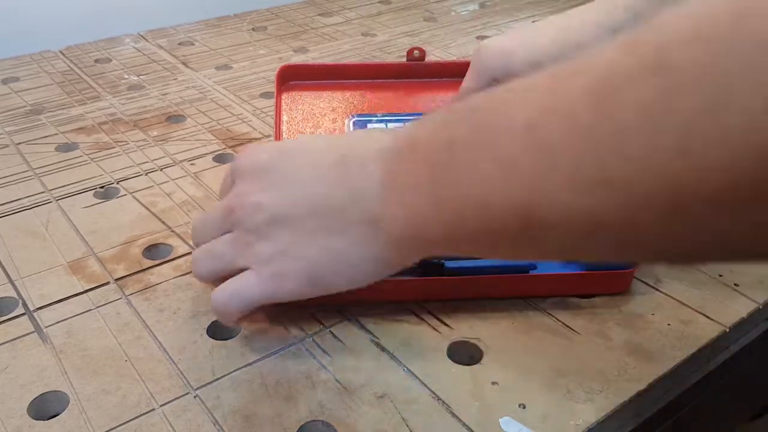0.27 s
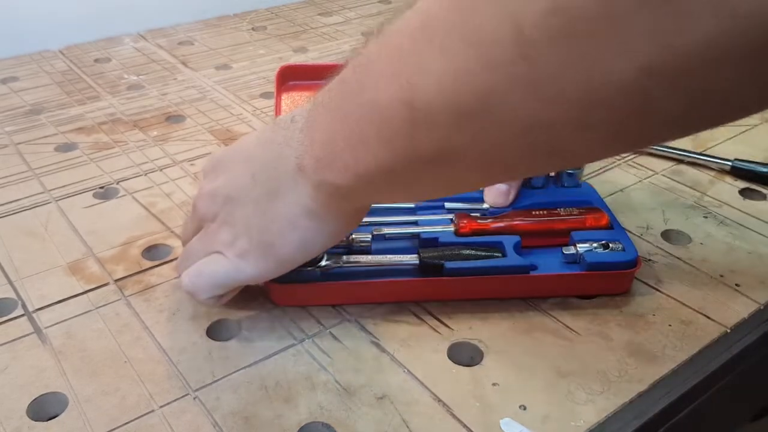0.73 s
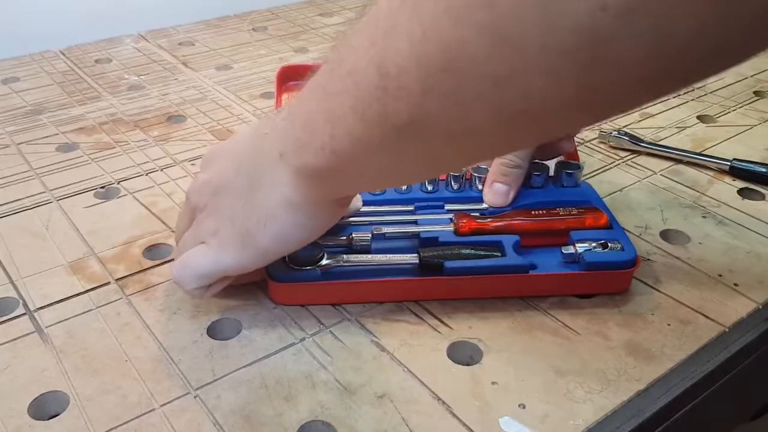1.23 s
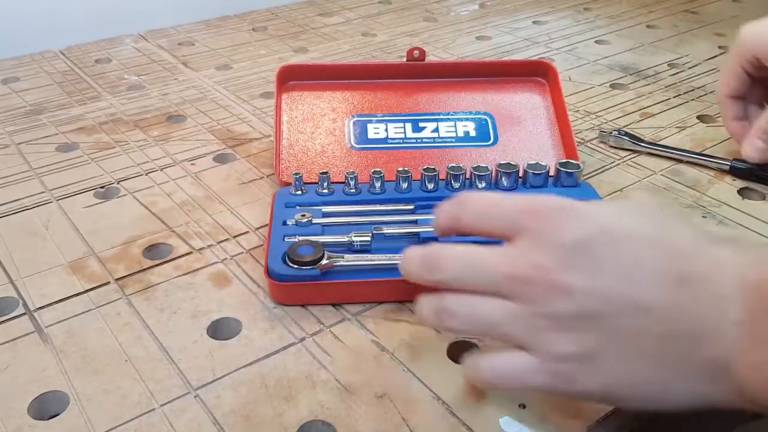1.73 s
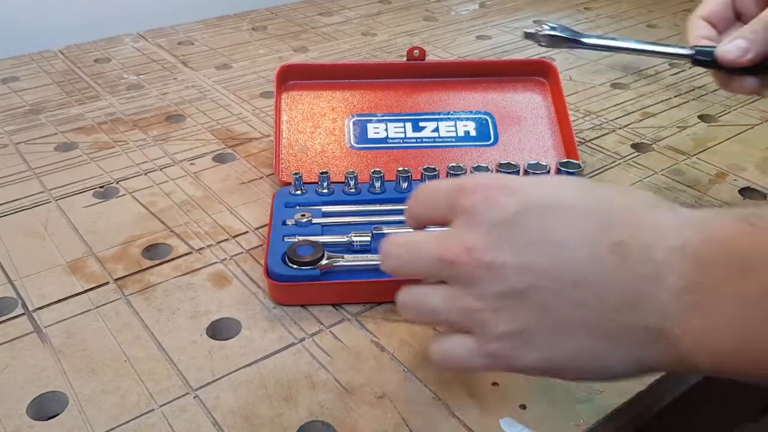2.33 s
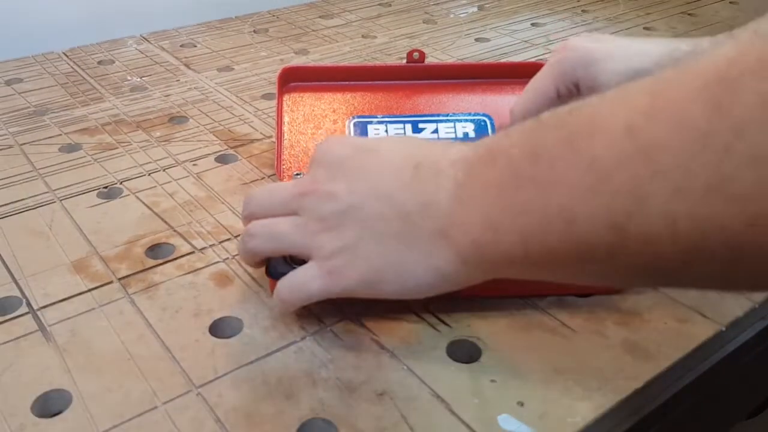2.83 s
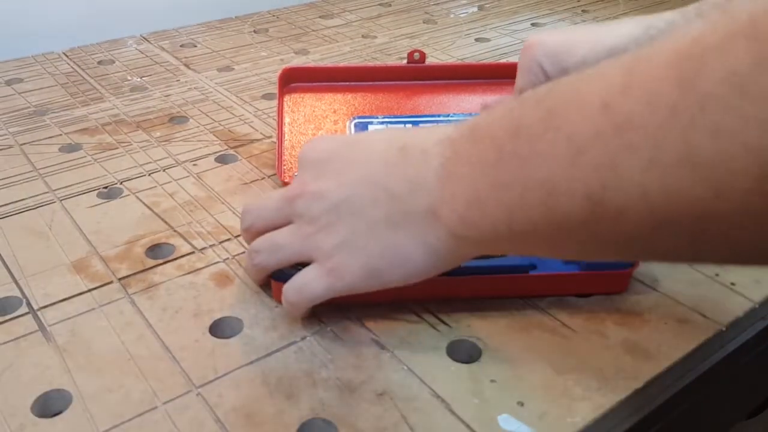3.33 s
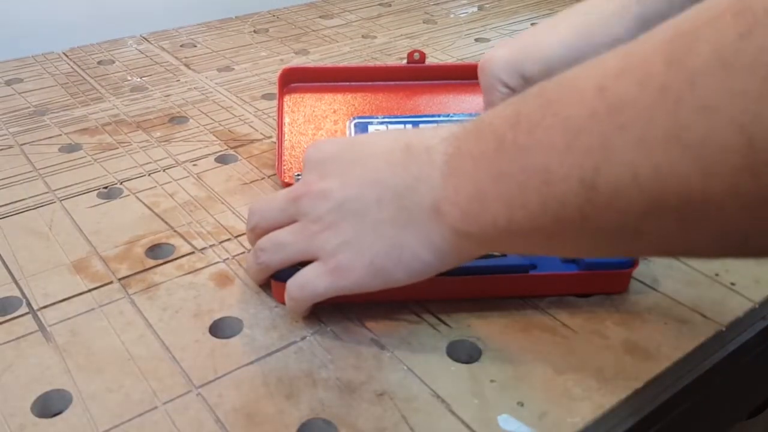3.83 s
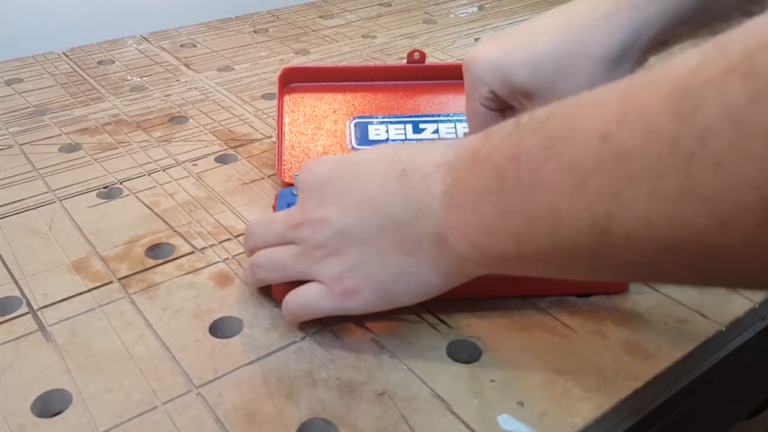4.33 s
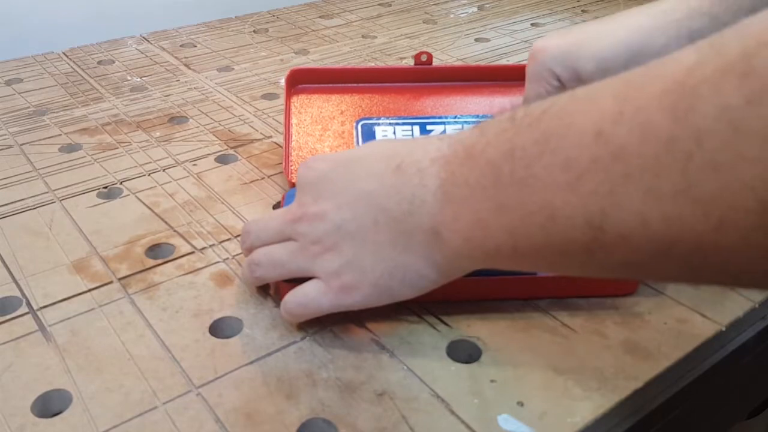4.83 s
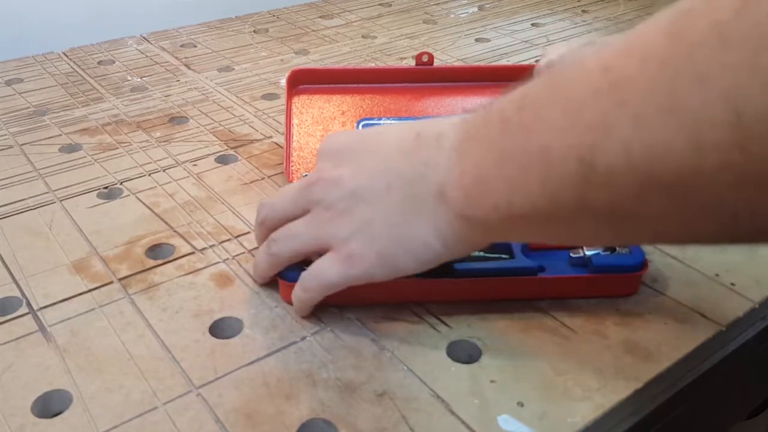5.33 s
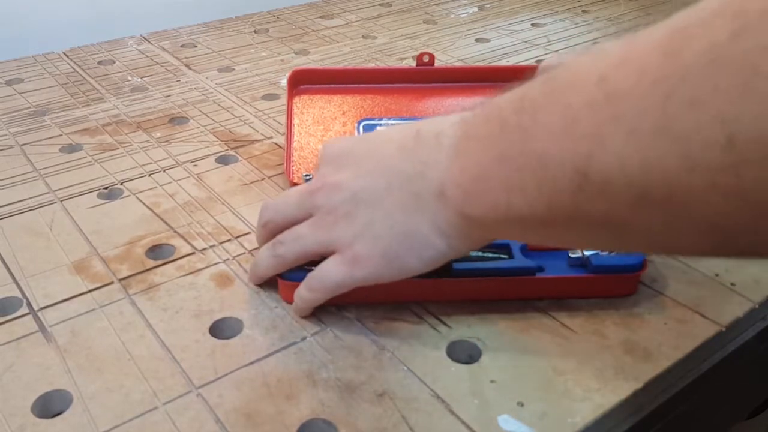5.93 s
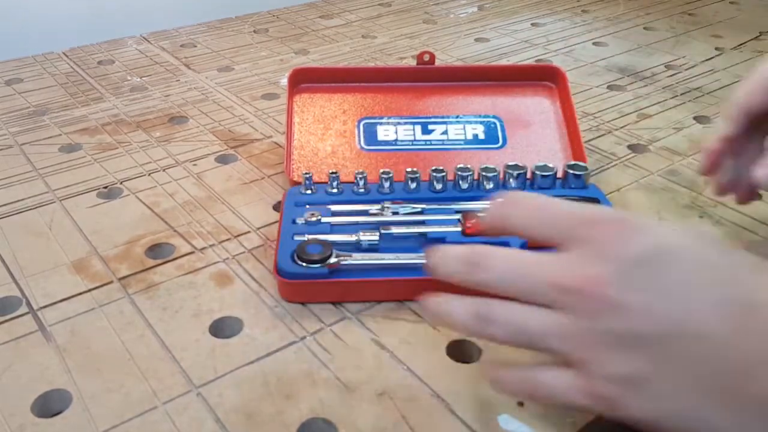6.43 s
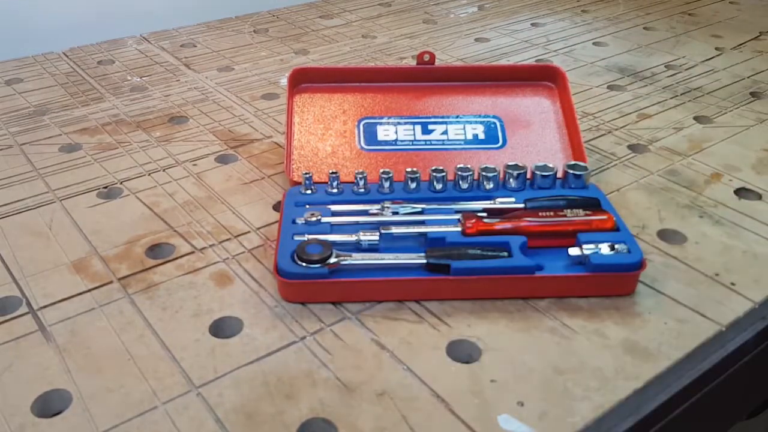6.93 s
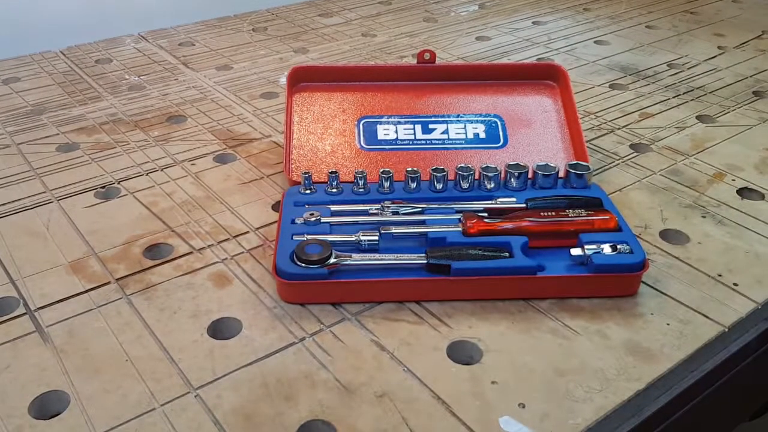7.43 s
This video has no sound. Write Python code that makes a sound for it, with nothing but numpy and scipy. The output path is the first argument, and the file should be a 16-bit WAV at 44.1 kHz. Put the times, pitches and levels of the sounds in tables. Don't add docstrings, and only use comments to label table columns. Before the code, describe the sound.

Hands fit tools into a plastic tray in a sheet-metal case on a wooden bench. Soft snaps, then a loud hard tick; a handle knocks and judders over wood; a steel bar drops in with two bright clacks and bounces. Quiet pushing, a clink, a tiny squeak and small clip snaps follow, then the ratchet clicks home. Close stereo microphone in a small room with low rumble and hiss.

```python
import sys
import numpy as np
from scipy import signal
from scipy.io import wavfile
from scipy.ndimage import uniform_filter1d

SR = 44100
rng = np.random.default_rng(int(sys.argv[2]) if len(sys.argv) > 2 else 0)


def transcribe(u):
    v = np.clip(np.atleast_2d(u).T, -1, 1)
    q = np.round(v * 32767).astype(np.int16)
    wavfile.write(sys.argv[1], SR, q)


def voltage_ratio(decibels):
    exponent = np.asarray(decibels, float) / 20
    return 10 ** exponent


N = 339040

# hz, level_db_per_hz
FLOOR_SPECTRUM = [(15, -41), (25, -13.5), (113, -3), (221, -16), (247, -15.5), (298, -12), (471, -13.5),
                  (510, -16), (616, -16), (785, -18), (1060, -18.5), (1210, -20.5), (15600, -30)]
FLOOR_DB = -57.5
# hz, correlation
FLOOR_LIKENESS = [(60, 0.96), (180, 0.82), (550, 0.31), (1650, 0.11), (4970, 0.029), (15000, 0.37)]
# hz, width_hz, level_db
HUM_LINES = [(117.2, 25, -66), (220.5, 11.5, -72.5), (294.5, 3.7, -72.5), (427, 9, -81), (482.4, 5.3, -74),
             (580, 5.9, -79)]
# peak_s, rise_s, fall_s, level_db
MACHINE_LOADS = [
    (.02, .02, 0.99, -62),
    (1.25, .4, 0.91, -60),
    (3.6, 1.3, 0.49, -72),
    (4.56, 0.35, .25, -60),
    (5.65, 0.95, 0.18, -59.5),
    (7.0, 1.4, 1, -61),
]
MACHINE_IDLE_DB = -86
# hz, t60_s, level_db
ROOM_TAIL = [(60.3, 1, -12), (247, 0.27, -4.5), (635, 0.33, 6), (2000, 0.21, 8.5), (6300, 0.25, 6.5),
             (15000, 0.19, 2)]
# delay_s, left_db, right_db, right_lag_samples
WALL_ECHOES = [
    (0, -17, -18, 0),
    (.0066, -2, -1, 1),
    (0.013, -18, -15.5, -2),
    (0.0177, -28.5, -32, 2),
]
BAND_EDGE_HZ = 15900
UNSHADED_DB = -14
LEFT_SHADE_DB_PER_KHZ = -0.9
PORT_SPREAD_DB = 1.2
STROKE_ENDS_DB = -15.5

# hz, level_db, t60_s
BENCH_MODES = [(67.7, -3.5, 0.17), (87, -9, 0.42), (104.7, 4, 0.11), (183.9, -11, 0.3)]
# hz, level_db, t60_s
CORNER_MODES = [(54.3, -3.5, 0.1), (84.3, 3, 0.35), (146.6, 4, 0.1), (185, -10, 0.23)]
# hz, level_db, t60_s
CASE_MODES = [(216.1, -4, 0.24), (247.7, -1, 0.17), (320.6, -1.5, 0.14), (369, -2, 0.14),
              (433.8, -4.5, 0.16), (541.3, -7, 0.13), (618, -29, 0.76)]
# hz, level_db, t60_s
BOARD_MODES = [(255, -15, 0.32), (341.4, -3, 0.14), (425, -4, 0.13), (446, -5, 0.1), (524, -4, 0.094),
               (665, -11.5, 0.063)]
# hz, level_db, t60_s
TRAY_MODES = [(700, -2, .04), (840, -3, .035), (980, -1, .02), (1150, -2, .015), (1320, -4, .012),
              (1560, -1, .012), (1780, -3, .012), (2020, -6, .012), (2280, -7, .012), (2750, -11, .008),
              (3200, -11, .008), (4000, -14, .006)]
# hz, level_db, t60_s
BAR_MODES = [(1460, -3, .012), (2150, -6, .006), (3010, -8, .016), (4300, -2, .012), (5350, -5, .008),
             (6100, -6, .012), (7010, -8, .008), (8300, -7, .008), (9230, -4, .012), (10100, -9, .008),
             (11400, -7, .008), (12100, -5, .012), (12800, -4, .01), (13200, -4, .01), (13900, -3, .015),
             (14450, -5, .01), (15500, -12, .006)]
# hz, level_db, t60_s
SOCKET_MODES = [(1030, -17, 0.028), (1750, -11, 0.0075), (2300, -4, 0.014), (3400, 5, 0.0057),
                (4400, 2.5, 0.0054), (4900, 0, 0.0086), (5800, -7, 0.015), (7000, -12, 0.0086),
                (8040, -7, 0.014), (10350, -9, .005), (12900, -7, 0.0054)]
# hz, level_db, t60_s
LID_MODES = [(60, -10, 0.24), (110, -6, 0.26), (221.5, -8.5, 0.35), (247.2, -4, 0.33), (293.4, -7, 0.29),
             (323.2, 3.5, .22), (362, -8, .25), (391, -8, 0.24), (432.3, -11, 0.26), (486, -15, 0.34),
             (557, -20, 0.36), (630, -19, 0.32), (702, -25, 0.34), (756, -21, .25)]
# hz, level_db, t60_s
PLANK_MODES = [(340.5, -1.5, .13), (444.5, -1, 0.11), (530, -6, .2), (630, -11, .1), (830, -20, 0.073)]
# hz, level_db, t60_s
EDGE_MODES = [(247, -14, .4), (333, -9, .06), (453, -3.5, 0.19), (500, -7, 0.21), (690, 3.5, .045),
              (850, -5, 0.079), (960, -17, 0.17), (1200, -15, .1), (1400, -16, .05), (2730, -16, 0.027),
              (4200, -17, .015)]
# hz, level_db, t60_s
BASE_MODES = [(88, -6.5, .22), (131.8, 3, 0.12), (150, -3.5, .16), (183, -11.5, 0.24), (268.7, -16.5, 0.27),
              (331.6, -10.5, 0.19), (743, -16.5, 0.18)]
# hz, level_db, t60_s
SLEEVE_MODES = [(1070, -8, 0.45), (3200, -5, 0.14), (5570, -6, .18), (5670, -2, .22), (5900, -4, .25),
                (5945, -1.5, .24), (6020, 0, .2), (7760, -11, .18), (7950, -11, .22), (8100, -7, .25),
                (8060, -9, .2), (8240, -13, .15)]

# start_s, level_db, contact_s
LID_HITS = [
    (.9527, -17, 0.0058),
    (0.28, -49, .006),
    (2.712, -39.5, .006),
]
# start_s, level_db, contact_s
PLANK_HITS = [
    (1.889, -38, 0.0033),
    (1.9, -36.5, 0.0043),
    (1.918, -33, .004),
    (1.94, -37, .004),
    (2.02, -46, .004),
    (2.054, -41, .005),
    (2.078, -51, .005),
]
# start_s, level_db, contact_s
EDGE_HITS = [
    (2.1106, -25, 0.00047),
    (2.128, -35.5, .002),
]
# start_s, level_db, contact_s
BASE_HITS = [
    (5.8084, -24, 0.0056),
    (5.868, -34.5, 0.0067),
    (5.955, -45, 0.0054),
    (6.229, -47, .003),
]
# start_s, level_db, contact_s
SLEEVE_HITS = [
    (4.3693, -39, .0004),
    (4.408, -50.5, .005),
]

# peak_s, rise_s, fall_s, level_db
HAND_LEANS = [(.77, 0.068, 0.18, -55), (2.959, 0.031, 0.054, -61), (3.104, 0.07, 0.12, -57.5),
              (3.31, 0.09, 0.14, -57.5), (3.95, 0.36, 0.16, -56.5), (4.251, .14, 0.36, -62),
              (4.63, 0.033, 0.054, -51), (4.8, .1, .3, -51), (5.05, 0.099, 0.32, -53),
              (5.55, 0.29, 0.25, -60), (5.94, 0.035, 0.07, -52), (6.22, 0.059, 0.42, -60),
              (6.802, 0.43, 0.16, -64), (7.025, 0.062, .06, -65), (7.57, 0.327, .06, -70),
              (7.68, 0.0464, .03, -56)]
# (bright over dull share, 8.2 dB per unit)
SKIN_RUBS = [(.003, 0.0029, 0.057, -56, -0.7), (.22, 0.13, 0.17, -57.5, -0.3), (.335, 0.016, 0.12, -57, -1),
             (1.124, 0.026, 0.09, -51, -8), (1.407, 0.018, 0.043, -58, -0.5), (2.56, 0.057, .12, -61, 0),
             (4.173, 0.032, 0.034, -54.5, -6), (4.85, 0.13, 0.067, -52, -2.1),
             (5.46, 0.097, 0.026, -61.5, -1), (5.506, 0.0097, .07, -65, 2),
             (5.98, 0.082, 0.067, -57.5, -0.9), (6.33, 0.17, 0.27, -62, 1.5),
             (6.57, 0.31, 0.14, -58.5, 0.2), (6.714, 0.026, 0.024, -59.5, .5), (6.79, 0.082, 0.062, -54, 0),
             (7.204, .015, 0.018, -61, -1), (7.68, 0.1, .03, -59, 0)]
# time_s, pitch_hz, level_db
SQUEAK_CURVE = [
    (4.718, 3090, -72),
    (4.728, 3080, -61),
    (4.74, 3080, -72),
    (4.752, 3026, -51.5),
    (4.772, 3090, -66),
    (4.784, 3050, -74),
]
# peak_s, rise_s, fall_s, level_db
HANDLE_DRAGS = [
    (1.814, 0.013, 0.043, -52),
    (1.912, 0.04, 0.12, -46),
    (2.026, .02, 0.12, -42),
    (2.112, 0.015, 0.042, -37),
]
# start_s, pitch_hz, level_db, t60_s
SLOT_PINGS = [(0.9584, 4750, -33, 0.0053), (0.9567, 1670, -33, 0.0063), (0.959, 980, -32.5, 0.0063),
              (5.811, 2300, -39, 0.006), (2.11, 2180, -35.5, 0.011), (1.115, 3910, -42.5, 0.017),
              (1.121, 2230, -41, 0.014), (1.14, 716, -43, 0.018), (1.812, 2980, -46, .008),
              (2.371, 4400, -51, 0.0045), (2.784, 2970, -38.5, 0.013), (1.403, 1770, -51, .006),
              (2.1107, 900, -35, 0.0052), (2.678, 1280, -25, 0.0066), (2.679, 9200, -31, .015),
              (2.7096, 2100, -25.5, 0.0053), (2.7035, 14000, -31, .005), (2.7092, 12970, -12, 0.0086),
              (2.721, 13050, -30, .012), (2.7845, 12850, -23, 0.0067), (4.114, 5100, -44, 0.004),
              (4.165, 3020, -55, .015), (5.026, 6030, -43, 0.0046), (5.027, 1860, -30, 0.0032),
              (6.229, 1270, -49, 0.013), (6.23, 3400, -49, 0.0067)]
# start_s, pitch_hz, level_db, t60_s
OPEN_PINGS = [(2.672, 6860, -31, .006), (2.672, 9100, -36, .006), (2.672, 1350, -33, 0.0069),
              (2.6795, 9300, -32, .07), (2.6795, 6300, -25, .012), (2.7022, 1600, -23, 0.007),
              (2.703, 4900, -27, .007), (2.7033, 14100, -22, .008), (2.7083, 2900, -27, .012),
              (2.7095, 4560, -24.5, .012), (2.7108, 1000, -31.5, 0.018), (2.717, 9100, -30, 0.027),
              (2.777, 5500, -28, .01), (2.776, 1310, -35, 0.0069), (2.7828, 8020, -33, 0.017),
              (2.7832, 2940, -34, 0.03), (2.7833, 5880, -35.5, 0.069), (5.7995, 3030, -48, .005),
              (5.7995, 9500, -47, .003), (5.7995, 13000, -54, .003), (5.81, 2560, -44, .01),
              (6.229, 1270, -48.5, 0.019), (6.228, 3400, -49, .015), (6.241, 2300, -50, .015),
              (6.269, 2330, -56, .04), (2.371, 4400, -49, 0.0072), (.82, 328, -53.5, .08),
              (4.1133, 2050, -42.5, .006), (4.1133, 4900, -44, .005), (4.12, 2000, -43, .006),
              (4.12, 5000, -46, .005), (4.174, 2990, -54, .04), (5.009, 1900, -46, .012),
              (5.0325, 2000, -42, .008), (5.0365, 2050, -41, .008), (5.047, 1950, -42, 0.011),
              (5.053, 1750, -44, .008), (.9575, 4950, -31, .008), (.957, 4250, -32, .012),
              (.9575, 7100, -40, .008), (.962, 860, -38, .15), (2.704, 700, -31, .15),
              (2.712, 840, -34, .1), (2.778, 700, -38, .1), (5.8095, 5200, -50, 0.0069),
              (5.812, 1300, -44, .05), (2.113, 2300, -44, .15), (1.808, 600, -48, .02),
              (1.108, 4100, -52, .015), (1.121, 2100, -47, .03), (1.12, 5800, -53, .03),
              (1.14, 2300, -51, .03), (.255, 2000, -52, .012), (1.403, 1780, -56, .012),
              (1.403, 12500, -55, .02), (4.297, 5900, -61, .03), (2.7093, 13070, -15, .022),
              (2.7195, 13010, -24, .03), (2.7838, 12900, -26, 0.018)]

# start_s, tick_db, bench_db, case_db, tray_db
PUSHES = [
    (0.0034, -46, -52, -55, -50.5),
    (0.3598, -65, -51, -41.5, -50.5),
    (3.0789, -67, -58, -51, -59),
    (3.8999, -64, -47.5, -54, -54),
    (4.1651, -60, -48, -48.5, -57),
    (5.9544, -66, -51, -46, -51),
    (5.9744, -50, -58, -59, -52.5),
    (6.2282, -53, -54, -64, -69),
    (6.2424, -65, -65, -62, -58),
]
# start_s, tick_db, bench_db, case_db, tray_db
SNAPS = [(0.2558, -49, -63, -53, -51.5), (0.3143, -37.5, -46, -32, -40), (1.1337, -52, -65, -53, -47),
         (1.4043, -54, -60, -58, -55), (4.1137, -42.5, -63, -49.5, -58), (4.144, -52, -51, -77, -56),
         (4.2971, -48.5, -63, -61, -60), (5.0116, -48, -54, -57, -68), (5.025, -45, -64, -64, -46),
         (5.0464, -39, -59, -42.5, -46.5), (5.2164, -49, -65, -55, -58.5), (5.4557, -49, -54, -54.5, -59),
         (6.2714, -51, -63, -72, -68), (7.52, -51, -56, -63, -56)]
# start_s, tick_db, bench_db, case_db, tray_db
TICKS = [
    (0.9572, -24.5, -35.5, -33.5, -35.5),
    (1.1169, -44, -59, -48, -49),
    (2.3708, -47, -68, -80, -60),
    (5.3883, -47, -60, -75.5, -71),
    (5.5029, -46, -49, -57, -60),
]
# start_s, tick_db, bench_db, board_db, tray_db
TOUCHES = [
    (1.8108, -45, -48.5, -66, -52),
    (1.8875, -46, -66, -39, -45),
    (1.8965, -41, -68, -44, -44),
    (2.103, -49, -60, -54, -49),
    (1.9059, -37.5, -58, -33.5, -40),
    (1.9194, -50, -65, -43, -41),
    (2.1102, -37.5, -60, -52, -32),
    (2.1294, -45, -56, -47, -36),
    (2.151, -58, -52, -38, -42.5),
    (2.1745, -63, -56, -53, -46.5),
]
# start_s, tick_db, bench_db, case_db, tray_db
SEATS = [
    (4.5357, -58, -43, -42, -50.5),
    (5.7995, -42.5, -47, -56, -55),
    (5.8091, -33.5, -49, -43, -37.5),
    (5.8172, -45, -46, -42, -38),
]
# start_s, tick_db, bench_db, case_db, tray_db
DROPS = [
    (2.6792, -18, -52, -41, -37.5),
    (2.7089, -15.5, -55, -39.5, -30),
]
# start_s, tick_db, bench_db, case_db, tray_db
BOUNCES = [
    (2.7205, -29, -40, -37.5, -45),
    (2.7833, -23.5, -42, -40, -37),
]
# start_s, tick_db, bench_db, case_db, tray_db
CLINKS = [
    (4.3695, -30, -55.5, -53.5, -52),
]
PUSH_HZ, SNAP_HZ, TICK_HZ, TOUCH_HZ, SEAT_HZ = 1250, 1900, 4400, 1850, 2100
DROP_HZ, BOUNCE_HZ, CLINK_HZ = 9100, 4200, 4940


def evened(x):
    return x / np.sqrt(np.mean(x ** 2) + 1e-20)


def read(points, hz, column=1):
    points = np.array(points)
    return np.interp(np.log(hz + 1), np.log(points[:, 0] + 1), points[:, column])


def add(mix, start_s, sound):
    part = mix[..., max(round(start_s * SR), 0):][..., :sound.shape[-1]]
    part += sound[..., :part.shape[-1]]


def band(x, lo_hz, hi_hz):
    return signal.sosfilt(signal.butter(2, [lo_hz, min(hi_hz, 20000)], "band", fs=SR, output="sos"), x)


def stroke(peak_s, rise_s, fall_s, db, *rest):
    u = np.linspace(-1, 1, 11)
    time_s = peak_s + u * np.where(u < 0, rise_s, fall_s)
    return np.transpose([time_s, db + STROKE_ENDS_DB * abs(u), *[c + 0 * u for c in rest]])


def span(rows):
    s, *columns = np.transpose(rows)
    t = np.arange(s[0], s[-1], 1 / SR)
    return s[0], signal.windows.tukey(len(t), .15), [np.interp(t, s, c) for c in columns]


def drone(hz, width_hz):
    pole = np.exp(-np.pi * width_hz / SR)
    noise = [1, 1j] @ rng.standard_normal((2, N)) + 0.91 * np.sqrt(width_hz / SR)
    slow = signal.lfilter([1], [1, -pole], noise)
    return evened((slow * np.exp(2j * np.pi * hz * np.arange(N) / SR)).real)


def machine():
    t = np.arange(N) / SR
    gain = voltage_ratio(MACHINE_IDLE_DB)
    for row in MACHINE_LOADS:
        gain = gain + voltage_ratio(np.interp(t, *stroke(*row).T, left=-99, right=-99))
    return gain * drone(64, 0.59)


def floor():
    frames, hz = N // 512 + 5, np.fft.rfftfreq(2048, 1 / SR)
    a, b, c, d, patches = rng.standard_normal((frames, 1025, 5)).T
    patches = evened(uniform_filter1d(uniform_filter1d(patches, 12, 0), 7, 1))
    same = np.clip(read(FLOOR_LIKENESS, hz), -1, 1)[:, None]
    left = a + 1j * b
    right = same * left + np.sqrt(1 - same ** 2) * (c + 1j * d)
    z = np.array([left, right]) * voltage_ratio(read(FLOOR_SPECTRUM, hz)[:, None] + .5 * patches)
    air = voltage_ratio(FLOOR_DB) * evened(signal.istft(z, nperseg=2048, noverlap=1536)[1][:, :N])
    hum = sum(voltage_ratio(db) * drone(f, width_hz) for f, width_hz, db in HUM_LINES)
    return air + machine() + hum


def room(x):
    taps = np.zeros((2, SR // 2))
    slots = np.arange(360, SR // 2 - 20, 20)
    at = slots + rng.integers(0, 20, (2, len(slots)))
    np.put_along_axis(taps, at, rng.choice([-1., 1.], at.shape), 1)
    hz, t, z = signal.stft(taps, SR, nperseg=256)
    decay_db = read(ROOM_TAIL, hz, column=2)[:, None] - 60 * t / read(ROOM_TAIL, hz)[:, None]
    tail = 0.14 * signal.istft(z * voltage_ratio(decay_db), SR, nperseg=256)[1]
    for s, left_db, right_db, lag in WALL_ECHOES:
        tail[0, round(s * SR)] += voltage_ratio(left_db)
        tail[1, round(s * SR + lag)] += voltage_ratio(right_db)
    low = signal.sosfiltfilt(signal.butter(1, 1200, fs=SR, output="sos"), tail[1] - tail[0])
    tail += 0.37 * np.array([low, -low])
    tail[0] -= 0.38 * band(tail[0], 9900, 16800)
    lead = round(WALL_ECHOES[1][0] * SR)
    return signal.fftconvolve(x[None], tail, axes=1)[:, lead:lead + N]


def slips(count, per_s, spread_db):
    u, e, g = rng.random(count), rng.exponential(1, count), rng.standard_normal(count)
    return (u < per_s / SR) * voltage_ratio(spread_db * np.minimum(e, 4)) * g


def rub(rows):
    s, edge, (db, tilt_db) = span(rows)
    grains = np.array([slips(len(db), 9000, 1.0), slips(len(db), 9000, 2.6)])
    dull = evened(band(grains, 600, 3800))
    bright = evened(band(grains, 2300, 10000))
    share = voltage_ratio(8.2 * tilt_db)
    x = (dull + share * bright) / np.sqrt(1 + share ** 2)
    return s, voltage_ratio(db) * edge * evened(x + 0.27 * x[::-1])


def squeak():
    s, edge, (hz, db) = span(SQUEAK_CURVE)
    phase = 2 * np.pi * np.cumsum(hz) / SR
    return s, voltage_ratio(db) * edge * (np.sin(phase) + 0.19 * np.sin(2 * phase))


def ring(modes, chance, contact_s=0.0034, spread_db=1.5, detune=0.0067):
    hz, db, t60 = np.transpose(modes)[:, :, None]
    t = np.arange(0, min(t60.max(), .5), 1 / SR)
    a, b = chance[:len(modes), None], chance[-len(modes):, None]
    decay = voltage_ratio(db + spread_db * a - 60 * t / t60)
    waves = decay * np.sin(2 * np.pi * hz * (1 + detune * b) * t)
    x = waves.sum(0) * (1 - np.exp(-t / contact_s))
    return x / abs(x).max()


def scrape(rows, modes, per_s, t60_scale):
    s, edge, (db,) = span(rows)
    body = ring([(f, d, t60 * t60_scale) for f, d, t60 in modes], np.zeros(len(modes)))
    jolts = slips(len(db), per_s, 1.6)
    return s, voltage_ratio(db) * edge * evened(signal.oaconvolve(jolts, body)[:len(db)])


def slot_pings():
    out = np.zeros(N)
    for s, hz, db, t60 in SLOT_PINGS:
        add(out, s, voltage_ratio(db) * ring([(hz, 0, min(t60, .016))], np.zeros(1), .0003))
    return out


def rings():
    out = np.zeros((2, N))
    bodies = [(LID_MODES, LID_HITS), (PLANK_MODES, PLANK_HITS), (EDGE_MODES, EDGE_HITS),
              (BASE_MODES, BASE_HITS), (SLEEVE_MODES, SLEEVE_HITS)]
    for modes, hits in bodies:
        lean = (-1.) ** np.arange(len(modes))
        for s, db, contact_s in hits:
            ports = [ring(modes, side * lean, contact_s, PORT_SPREAD_DB, .001) for side in (1, -1)]
            add(out, s, voltage_ratio(db) * np.array(ports))
    for s, hz, db, t60 in OPEN_PINGS:
        sides = voltage_ratio(np.array([[1], [-1]]) * LEFT_SHADE_DB_PER_KHZ * hz / 2000)
        ping = voltage_ratio(db) * ring([(hz, 0, t60)], np.zeros(1), 1 / hz)
        add(out, s, sides * np.array([ping, np.roll(ping, 1)]))
    return out


def blows(rows, hz, body, steel=None, tick_db=0, top=1.75, bench=BENCH_MODES):
    out, t = np.zeros(N), np.arange(2000) / SR
    chances = rng.standard_normal((len(rows), 2000))
    for (s, db, bench_db, body_db, tray_db), c in zip(rows, chances):
        click = (t == 0) + .25 * c * voltage_ratio(-60 * t / .004)
        crack = band(click, .55 * hz, top * hz)
        add(out, s, voltage_ratio(db + tick_db + 3.0) * crack / abs(crack).max())
        add(out, s, voltage_ratio(tray_db + 5) * ring(TRAY_MODES, c, 0.0006, 1.8, 0.035))
        add(out, s - .004, voltage_ratio(body_db + 2.5) * ring(body, c, 0.0064, 0.48, 0.0034))
        add(out, s - .006, voltage_ratio(bench_db + 4.5) * ring(bench, c, 0.0095, 0.54))
        if steel:
            add(out, s, voltage_ratio(db) * ring(steel, c, .0001, spread_db=1.5, detune=0.004))
    return out


def dropped_bar():
    bar = blows(DROPS, DROP_HZ, CASE_MODES, BAR_MODES, tick_db=7.0, top=2.1)
    return bar + blows(BOUNCES, BOUNCE_HZ, CASE_MODES, BAR_MODES, tick_db=7.0, top=2.9)


def tool_blows():
    near = blows(PUSHES, PUSH_HZ, CASE_MODES)
    near += blows(SNAPS, SNAP_HZ, CASE_MODES)
    near += blows(TICKS, TICK_HZ, CASE_MODES, top=2.05)
    near += blows(TOUCHES, TOUCH_HZ, BOARD_MODES)
    near += blows(SEATS, SEAT_HZ, CASE_MODES, top=1.48, bench=CORNER_MODES)
    return near + blows(CLINKS, CLINK_HZ, CASE_MODES, SOCKET_MODES, tick_db=0.5, top=2.65)


def scene():
    bar = dropped_bar()
    near = tool_blows() + bar + slot_pings()
    for row in HANDLE_DRAGS:
        add(near, *scrape(stroke(*row), BOARD_MODES + TRAY_MODES[:6], 300, 0.39))
    for row in HAND_LEANS:
        add(near, *scrape(stroke(*row), BENCH_MODES + CASE_MODES[:2], 400, 0.22))
    direct_bar = voltage_ratio(UNSHADED_DB) * np.roll(bar, -round(WALL_ECHOES[1][0] * SR))
    mix = room(near) + floor() + rings() + direct_bar
    add(mix, *squeak())
    for row in SKIN_RUBS:
        add(mix, *rub(stroke(*row)))
    return mix


def roll_off(x):
    return signal.sosfilt(signal.butter(12, 16600, fs=SR, output="sos"), x)


def record(dry):
    edge = signal.firwin(255, BAND_EDGE_HZ, window=("kaiser", 5), fs=SR)
    return roll_off(signal.oaconvolve(dry, edge[None], "same"))


dry = scene()
out = record(dry)
transcribe(out)
```